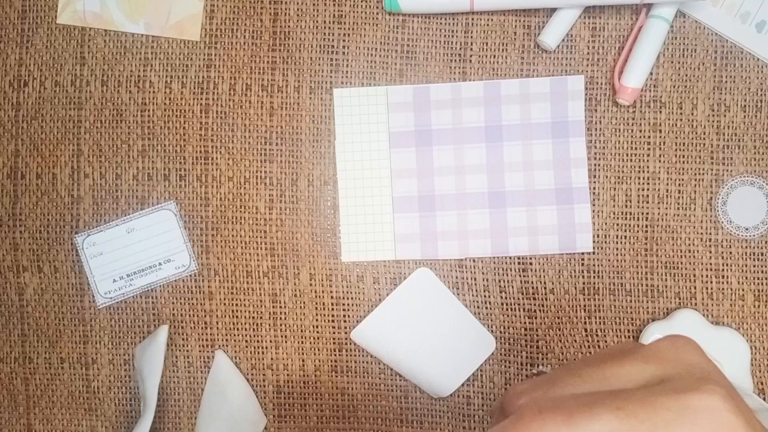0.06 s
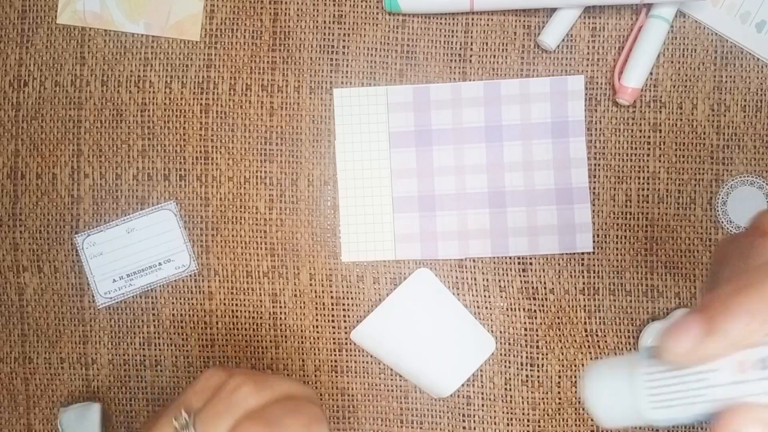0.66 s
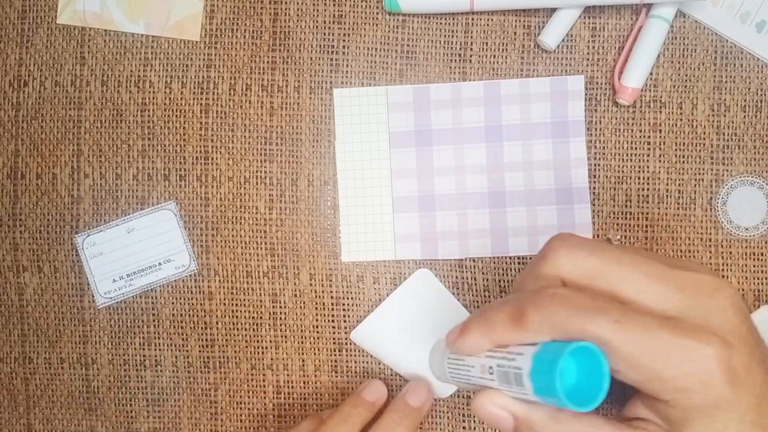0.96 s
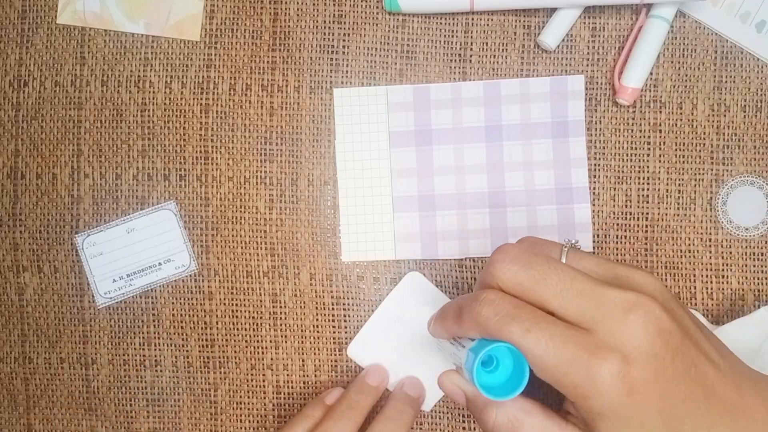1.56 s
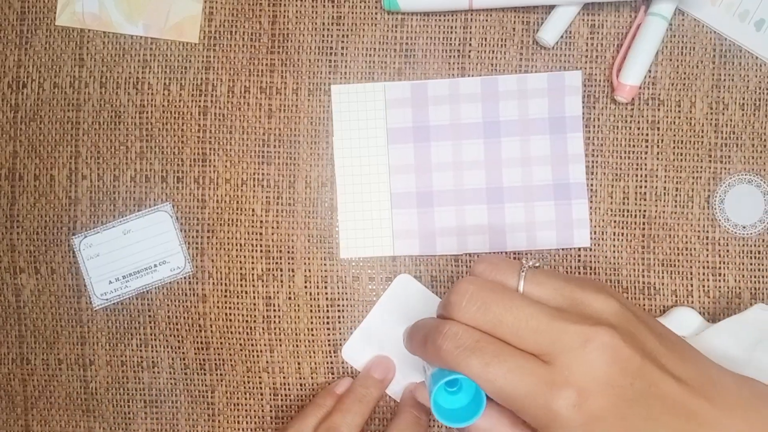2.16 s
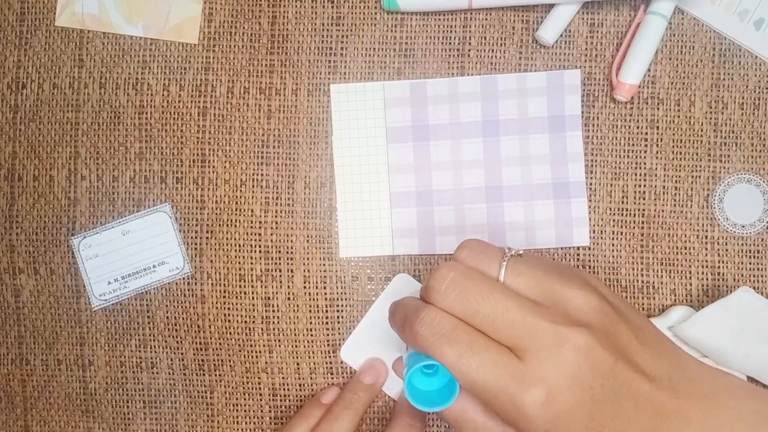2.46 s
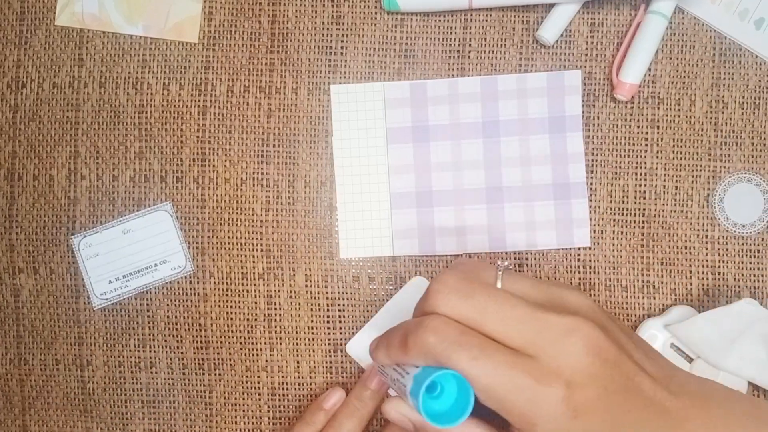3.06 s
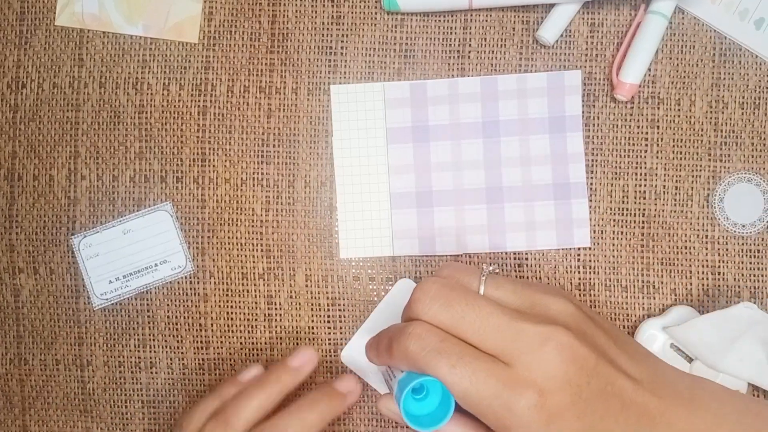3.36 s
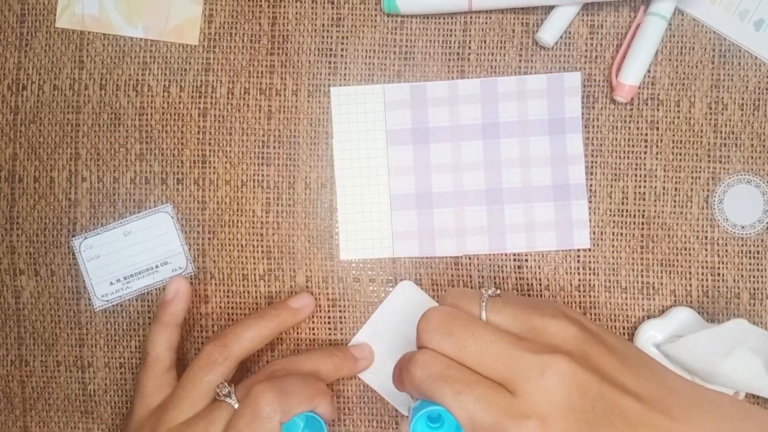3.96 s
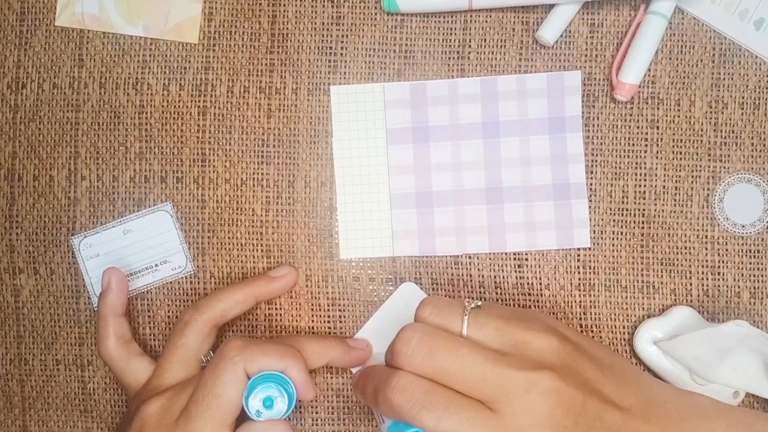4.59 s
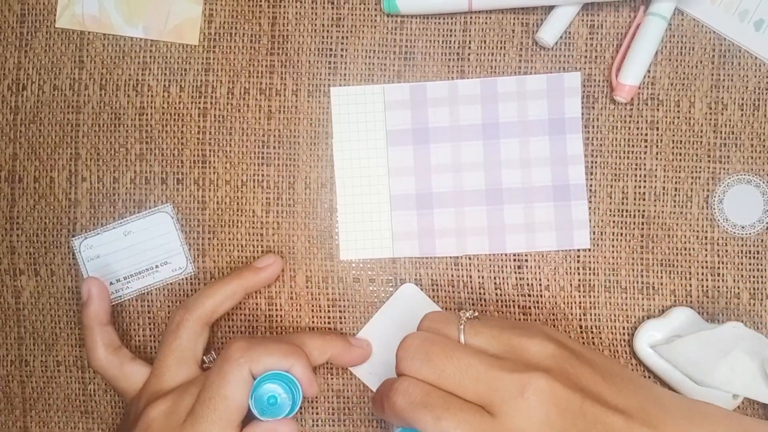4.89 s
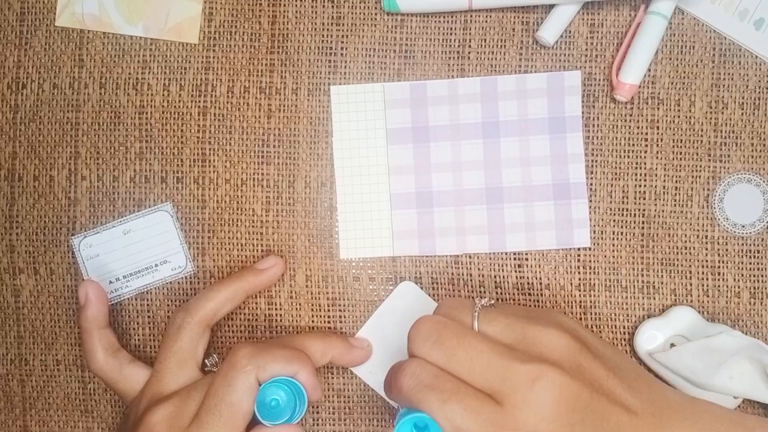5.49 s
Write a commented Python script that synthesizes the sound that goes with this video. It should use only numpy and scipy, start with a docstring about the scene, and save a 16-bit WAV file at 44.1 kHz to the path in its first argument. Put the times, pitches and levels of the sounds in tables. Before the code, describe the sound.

A plastic tool clacks onto a table, then a glue stick rubs on paper with tacky ticks, taps and soft bumps.

```python
"""A glue stick rubbed and tapped on a slip of paper, with tacky ticks and thin stick-slip squeaks.
First a plastic tool is put down: it lands flat and rocks on its edges, ringing its shell.
Hands and stick bump the cloth-covered table and make it shudder as they drag.
Heard close up in a small quiet room, over faint air, mains hum and an electronic whine."""
import sys
import numpy as np
from scipy import signal
from scipy.fft import rfft, irfft, next_fast_len
from scipy.io import wavfile

SR = 44100
rng = np.random.default_rng(int(sys.argv[2]) if len(sys.argv) > 2 else 0)


def master(y):
    """Save y as 16-bit WAV."""
    cut = np.clip(np.atleast_2d(y).T, -1, 1)
    pcm = np.round(cut * 32767)  # scale
    wavfile.write(sys.argv[1], SR, pcm.astype(np.int16))


N = 243873
TIME = np.arange(N) / SR


def rubbing(slips_per_s=7000, catch_db=2.5, fade_over_rise=1.15, board_hz=1740, board_db=-14.5):
    """Fibres catch and slip, ringing paper and table; faster strokes are broader, smoother, hissier."""
    # strokes on the paper: peak_s, half_length_s, level_db, centre_hz, speed (0-1)
    strokes = [(1.139, .042, -59, 4440, 0.3), (1.224, 0.1, -62, 5740, 0.7), (1.343, .055, -63.5, 5800, 0),
               (1.494, .06, -59.5, 5860, .3), (1.589, 0.078, -49, 5310, 0.78),
               (1.811, 0.03, -61.5, 5800, 1), (2.638, 0.017, -65, 6200, 0.75),
               (3.207, .025, -56, 4160, 0.3), (3.24, 0.015, -60, 4950, .6), (4.141, 0.048, -68, 5150, 0.83),
               (4.802, 0.051, -73.5, 5730, 0.44), (5.174, 0.021, -68.5, 4730, .6)]
    out = np.zeros(N)
    catching = from_db(catch_db * drift(170))
    for peak_s, half_s, db, hz, speed in strokes:
        width_hz = np.interp(speed, [0, 1], [400, 2500])
        grain_db = np.interp(speed, [0, 1], [4.5, 2])
        hiss_db = np.interp(speed, [0, 1], [-20, 3])
        rise_s = 2 * half_s / (1 + fade_over_rise)
        fade_s = rise_s * fade_over_rise
        t = np.arange(-2 * rise_s, 2 * fade_s, 1 / SR)
        pressure = np.exp(-2 * (t / np.where(t < 0, rise_s, fade_s)) ** 2)
        sizes = from_db(grain_db * np.minimum(rng.exponential(1, N), 4))
        signs = rng.choice([-1, 1], N)
        slipping = rng.random(N) < slips_per_s / SR
        slips = (sizes * signs * slipping)[:len(t)]
        paper = resonance(resonance(slips, hz, width_hz), hz, 4400)
        hiss = from_db(hiss_db) * resonance(slips, 7600, 9000)
        board = resonance(resonance(slips, board_hz, 1800), board_hz, 3500)
        stroke = rms_one(paper + hiss) + from_db(board_db) * rms_one(board)
        add(out, peak_s - 2 * rise_s, from_db(db) * pressure * stroke)
    return out * catching


def glue_ticks(width_hz=700, snap_db=-24):
    """A thread of glue snaps and the paper rings for a few cycles."""
    # glue letting go: start_s, level_db, ring_hz
    ticks = [(1.1472, -36.5, 4300), (1.1523, -33, 4380), (1.165, -40, 4460), (1.1965, -30, 4800),
             (1.2, -29.5, 3860), (1.3193, -48.5, 5900), (1.537, -43, 5600), (1.6673, -43, 5580),
             (2.629, -53, 6200), (3.184, -49.5, 4392), (3.2176, -38, 3970), (3.2308, -32.5, 4450)]
    out = np.zeros(N)
    for start_s, db, hz in ticks:
        snap = contact(decay_s=0.00096)
        ring = resonance(resonance(snap, hz, width_hz), hz, 5700)
        tick = ring + from_db(snap_db) * resonance(snap, 5800, 6000)
        add(out, start_s, from_db(db) * tick / np.abs(tick).max())
    return out


def glue_stick(x, ring_db=-4, highpass_hz=2950, leak_db=-7):
    """So small a source radiates little bass; its hollow tube adds narrow rings."""
    # tube modes: pitch_hz, width_hz, relative_db
    tube_modes = [(2780, 20, 9), (4000, 120, -5), (4340, 70, -6), (4364, 140, -1), (5330, 45, -25.5),
                  (5610, 59, 9.5), (5910, 110, -13), (6405, 120, 5.5)]
    thin = signal.sosfilt(signal.butter(8, highpass_hz, "high", fs=SR, output="sos"), x)
    tube = from_db(ring_db) * ring_modes(thin, tube_modes)
    return thin + tube + from_db(leak_db) * resonance(x, 1460, 1400)


def stick_tap():
    """The hard plastic rim meets the table through the paper and rings."""
    # rim impacts: start_s, force_db
    taps = [(2.7415, -10.5), (2.7426, -15.5), (2.7445, -16.5), (5.4915, -24.5)]
    # rim modes: pitch_hz, width_hz, gain_db
    rim_modes = [(1530, 670, -22), (2790, 24, 2), (4220, 180, 4.5), (4700, 160, -15), (5540, 140, -4.5),
                 (6900, 900, -16)]
    force = np.zeros(N)
    for start_s, db in taps:
        add(force, start_s, from_db(db) * contact(decay_s=0.00083))
    return ring_modes(force, rim_modes)


def glue_squeaks(jitter=0.02, rasp_db=3):
    """Fast regular slips of the glue make a thin, wavering tone."""
    # stick-slip bursts: peak_s, half_length_s, level_db, pitch_hz
    squeaks = [(0.983, 0.021, -65, 3780), (3.011, 0.044, -71.5, 4400), (3.019, 0.022, -70.5, 5440),
               (4.794, 0.021, -74, 6380)]
    out = np.zeros(N)
    wander = jitter * drift(400)
    flutter_db = rasp_db * drift(200)
    for peak_s, half_s, db, hz in squeaks:
        pressure = np.exp(-2 * ((TIME - peak_s) / half_s) ** 2)
        out += from_db(db + flutter_db) * pressure * tone(hz * (1 + wander))
    return out


def plastic_tool(gain_db=23, crack_db=-9, sizzle_db=-9, landing_s=0.4545, rocks=4):
    """The tool lands flat, then rocks, each hit sooner, weaker and duller; all crack and ring the shell."""
    # shell modes on the table: pitch_hz, width_hz, gain_db
    shell_modes = [(243.3, 109, 4), (403.6, 130, 5), (497, 115, -5), (976, 207, 2.5), (1254, 257, -4),
                   (1651, 850, -5), (2060, 175, 0.5), (2356, 261.5, 1.5), (2757, 180, 0), (3120, 150, -5),
                   (3968, 180, -3), (4300, 219.7, -5.5), (5430, 300, 3.5), (5970, 220, -9), (6275, 99, -12)]
    thud = (landing_s - 0.0012, -13.5, 318.5)   # the underside touches just ahead of the edge
    edge = (landing_s, -12, 4800)
    k = np.arange(rocks)
    rock_s = landing_s + np.cumsum(0.006 * 0.78 ** k)
    rock_db = -20 - 1.04 * k
    rock_hz = 3935 * 0.67 ** k
    force = np.zeros(N)
    for start_s, db, hz in [thud, edge, *zip(rock_s, rock_db, rock_hz)]:
        add(force, start_s, from_db(db) * resonance(contact(decay_s=0.0013), hz, 1.5 * hz))
    crack = from_db(crack_db) * force
    sizzle = from_db(sizzle_db) * resonance(force, 14500, 3477)
    return from_db(gain_db) * (ring_modes(force, shell_modes) + crack + sizzle)


def table_bumps(t60_s=0.11, overtone_ratios=(2.2, 3.4)):
    """A soft push swings the table top's lowest mode; a harder one brings out its overtones."""
    # pushes on the table: start_s, level_db, push_s, pitch_hz
    bumps = [(0.001, -55, .008, 93), (0.046, -52, 0.03, 52), (0.087, -54, 0.016, 69),
             (3.254, -31, .011, 104), (4.593, -38, 0.011, 100), (5.495, -19.5, 0.014, 118.6)]
    out, t = np.zeros(N), TIME[:16384]
    for start_s, db, push_s, hz in bumps:
        swell = np.sin(np.pi / 2 * np.minimum(t / push_s, 1)) ** 2
        decay = 1000 ** (-np.maximum(t - push_s / 2, 0) / t60_s)
        overtone_db = -27 + 0.75 * (db + 31)
        overtones = sum(np.sin(2 * np.pi * hz * ratio * t) for ratio in overtone_ratios)
        swing = np.sin(2 * np.pi * hz * t) + from_db(overtone_db) * decay * overtones
        add(out, start_s, from_db(db) * swell * decay * swing)
    return out


def table_shudder(rough_db=-8, ends_db=-8, ramp_s=0.008):
    """Stick-slip keeps the table top swinging unevenly until the drag stops."""
    # drags of hand or stick: start_s, peak_s, end_s, level_db, pitch_hz
    drags = [(0.84, .925, 0.968, -58, 140), (1.21, 1.235, 1.28, -69, 325), (1.452, 1.495, 1.58, -52.5, 121),
             (2.13, 2.21, 2.27, -75, 305), (2.735, 2.775, 2.801, -55.5, 125),
             (3.275, 3.31, 3.427, -49.5, 126), (4.615, 4.64, 4.77, -53, 126), (4.77, 4.795, 4.84, -73, 460)]
    out = np.zeros(N)
    wander = 0.05 * drift(70)
    flutter_db = 1.5 * drift(55)
    for start_s, peak_s, end_s, db, hz in drags:
        inside_s = np.minimum(TIME - start_s, end_s - TIME)
        gate = np.sin(np.pi / 2 * np.clip(inside_s / ramp_s, 0, 1)) ** 2
        effort_db = np.interp(TIME, [start_s, peak_s, end_s], [ends_db, 0, ends_db])
        swing = tone(hz * (1 + wander) * (TIME > start_s))
        friction = from_db(rough_db) * rms_one(band_noise(0.5 * hz, np.sqrt(2) * hz, order=3))
        out += gate * from_db(db + effort_db + flutter_db) * (swing + friction)
    return out


def nearby_echoes(x, scatter_db, decay_s=0.0037):
    """Hands and things on the table add echoes within a few milliseconds."""
    t = TIME[:1024]
    echoes = rng.standard_normal(len(t)) * np.exp(-t / decay_s) * np.minimum(t / 0.001, 1)
    return x + from_db(scatter_db) * signal.fftconvolve(x, echoes / np.linalg.norm(echoes))[:N]


def room_echoes(x, first_wall_s=0.004, build_s=0.0067):
    """Diffuse echoes build up after the first wall and die band by band."""
    # room response: frequency_hz, gain_db
    response = [(90, 3.5), (160, 16), (290, -1.5), (560, 1.5), (850, 0.5), (1500, -1.5), (3000, -3),
                (6000, -2), (14000, 1.5)]
    # room decay: frequency_hz, t60_s
    decay_times = [(150, 0.26), (500, .3), (2000, 0.28), (5500, 0.34), (14000, 0.2)]
    t, tail = TIME[:SR // 2], 0
    edges_hz = np.geomspace(70, 17000, 10)
    for low_hz, high_hz in zip(edges_hz, edges_hz[1:]):
        t60_s = at_hz(decay_times, np.sqrt(low_hz * high_hz))
        tail += band_noise(low_hz, high_hz, order=2, size=len(t)) * 1000 ** (-t / t60_s)
    tail *= np.clip((t - first_wall_s) / build_s, 0, 1)
    return signal.fftconvolve(x, colour(tail / np.linalg.norm(tail), response))[:N]


def room_air(air_db=-71.5, waver_db=3, rumble_db=-82, rumble_swing_db=4):
    """Steady air noise with faint wavering resonances and an uneven rumble."""
    # air spectrum: frequency_hz, relative_db
    spectrum = [(25, -15), (50, -6.5), (85, -4.5), (140, 0.5), (190, -4), (320, -7), (430, -9.5),
                (620, -7.5), (1400, -9), (1900, -12.5), (2600, -12), (5800, -15), (7000, -24),
                (9000, -32.5), (11600, -33), (12300, -24.5), (15500, -29.5)]
    air = from_db(air_db) * rms_one(colour(rng.standard_normal(N), spectrum))
    for hz, width_hz, db in [(1350, 220, -84.5), (2736, 160, -82), (7630, 200, -87.5)]:
        gain = from_db(db + waver_db * drift(12))
        band = resonance(rng.standard_normal(N), hz, width_hz)
        air += gain * rms_one(resonance(band, hz, 2 * width_hz))
    rumble = rms_one(resonance(resonance(rng.standard_normal(N), 50, 30), 54, 60))
    return air + from_db(rumble_db + rumble_swing_db * drift(9)) * rumble


def hum_and_whine():
    """Low mains hum and a thin electronic whine, most tones wavering in level."""
    # tones: pitch_hz, rms_db, waver_db
    tones = [(49.9, -88, 2.5), (111, -82.5, 3), (141, -83.5, 2), (214.6, -86.5, 0), (275, -90.5, 2.5),
             (329, -89.5, 2.5), (593, -92, 1), (647, -87.5, 0), (7571, -78, 0.44), (15070, -100, 0.9)]
    out = np.zeros(N)
    for hz, db, waver_db in tones:
        amplitude = np.sqrt(2) * from_db(db + waver_db * drift(6))
        out += amplitude * np.sin(2 * np.pi * (hz * TIME + rng.random()))
    return out


def from_db(db):
    return 10 ** (np.asarray(db) / 20)


def rms_one(x):
    return x / np.sqrt(np.mean(x ** 2) + 1e-20)


def at_hz(points, hz):
    """Read a table on a log-frequency axis."""
    knots_hz, values = np.transpose(points)
    return np.interp(np.log(np.maximum(hz, 1)), np.log(knots_hz), values)


def colour(x, spectrum):
    """Minimum-phase filter with the given dB curve."""
    size = 2 * next_fast_len(N)
    gain = from_db(at_hz(spectrum, np.arange(size // 2 + 1) * SR / size))
    cepstrum = irfft(np.log(gain))
    cepstrum[1:size // 2] *= 2
    cepstrum[size // 2 + 1:] = 0
    return irfft(rfft(x, size) * np.exp(rfft(cepstrum)))[:len(x)]


def resonance(x, hz, width_hz):
    """Two-pole resonance, peak gain 1."""
    r = np.exp(-np.pi * width_hz / SR)
    feedback = [1, -2 * r * np.cos(2 * np.pi * hz / SR), r * r]
    return signal.lfilter(np.array([1, 0, -1]) * (1 - r * r) / 2, feedback, x + 1e-18)


def ring_modes(x, modes):
    return sum(from_db(db) * resonance(x, hz, width_hz) for hz, width_hz, db in modes)


def band_noise(low_hz, high_hz, order, size=N):
    bandpass = signal.butter(order, [low_hz, high_hz], "band", fs=SR, output="sos")
    return signal.sosfilt(bandpass, rng.standard_normal(size))


def tone(hz):
    """Unit-rms sine following a pitch curve."""
    return np.sqrt(2) * np.sin(2 * np.pi * np.cumsum(hz) / SR)


def drift(knots_per_s):
    """Unit-rms random wander."""
    knots_s = np.arange(0, N / SR + 1, 1 / knots_per_s)
    return rms_one(np.interp(TIME, knots_s, rng.standard_normal(len(knots_s))))


def contact(decay_s):
    """A touch: a brief crunch of tiny impacts, unit energy, near-flat spectrum."""
    t = TIME[:1024]
    spectrum = rfft(rng.standard_normal(len(t)) * np.exp(-t / decay_s))
    crunch = irfft(spectrum / np.abs(spectrum)) * np.exp(-t / decay_s / 2)
    return crunch / np.linalg.norm(crunch)


def add(track, start_s, sound):
    start = max(round(start_s * SR), 0)
    track[start:start + len(sound)] += sound[:N - start]


def scene(tool_room_db=-8, paper_room_db=-11):
    """Sharp sounds excite the room; the table's low swings arrive directly."""
    # microphone response, notched in the treble: frequency_hz, gain_db
    microphone = [(30, -9.5), (70, 0.5), (5800, 0), (6700, -3.5), (7600, -12.5), (9500, -23.5),
                  (11500, -18.5), (13000, -8.5), (15000, -5.5), (16000, -19)]
    tool = nearby_echoes(plastic_tool(), scatter_db=-7)
    gluing = glue_stick(glue_ticks() + rubbing()) + stick_tap() + glue_squeaks()
    paper = nearby_echoes(gluing, scatter_db=-5)
    echoes = room_echoes(from_db(tool_room_db) * tool + from_db(paper_room_db) * paper)
    handling = tool + paper + echoes + table_bumps() + table_shudder()
    return (colour(handling, microphone) + room_air() + hum_and_whine())[None]


def record(dry):
    """Steep low-pass on the top treble."""
    cutoff_hz = 15700
    return signal.sosfilt(signal.ellip(10, 0.2, 80, cutoff_hz, fs=SR, output="sos"), dry)


dry = scene()
out = record(dry)
master(out)
```